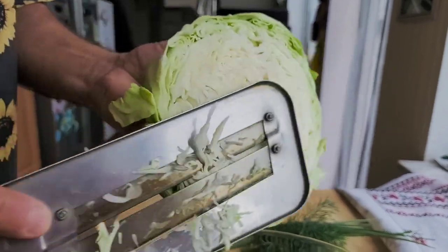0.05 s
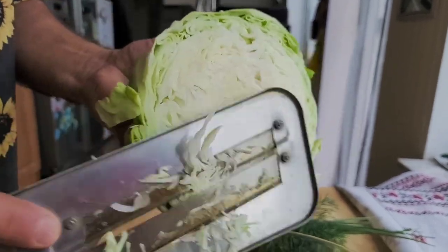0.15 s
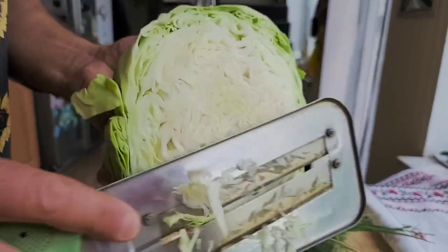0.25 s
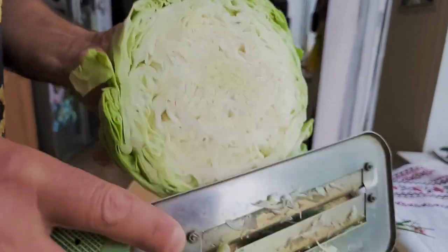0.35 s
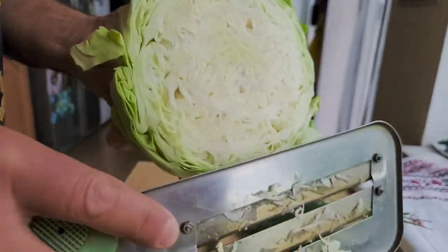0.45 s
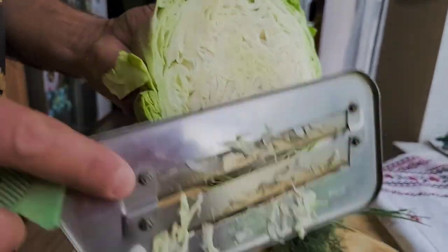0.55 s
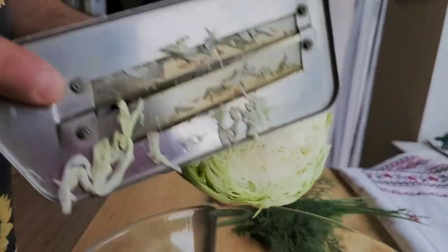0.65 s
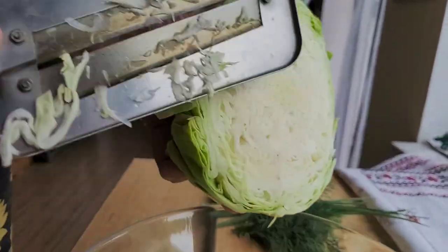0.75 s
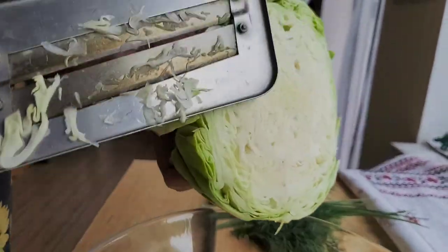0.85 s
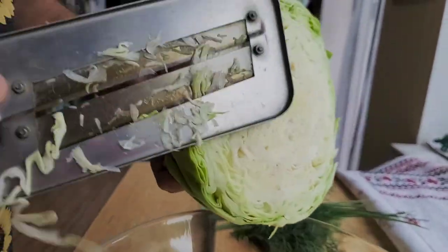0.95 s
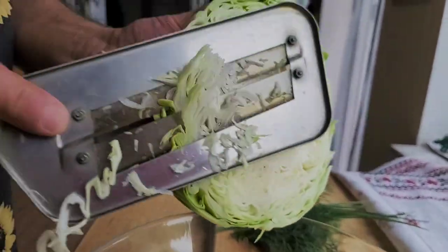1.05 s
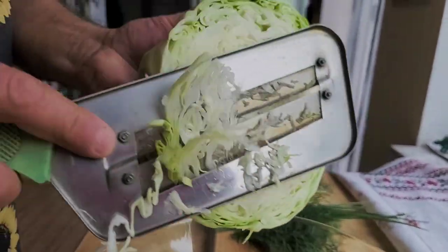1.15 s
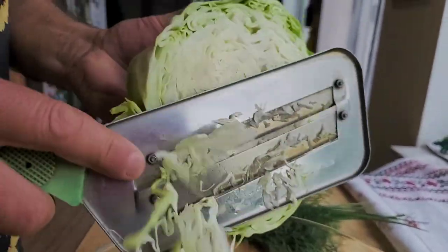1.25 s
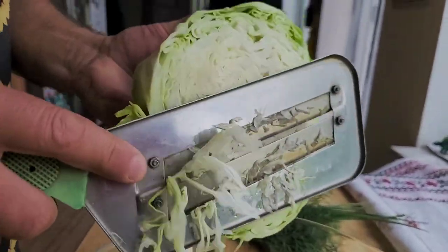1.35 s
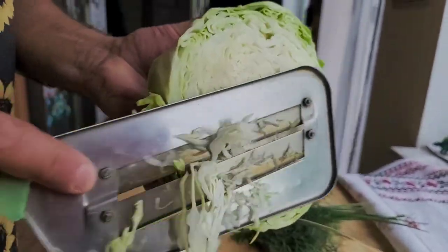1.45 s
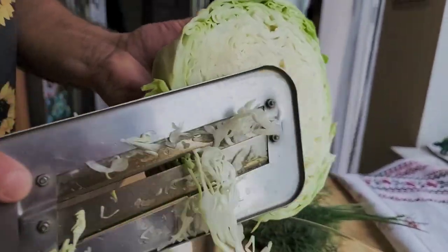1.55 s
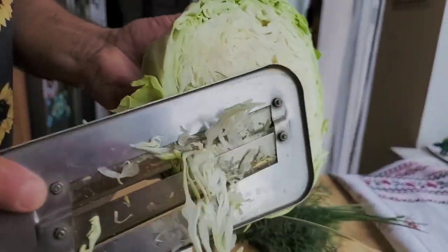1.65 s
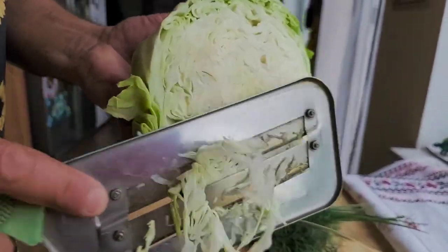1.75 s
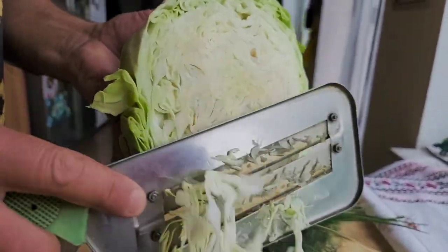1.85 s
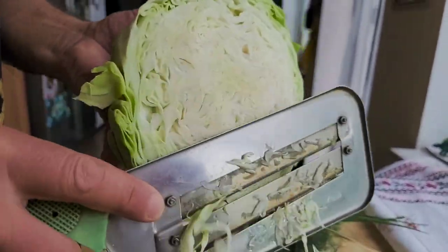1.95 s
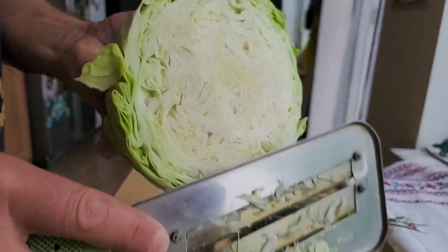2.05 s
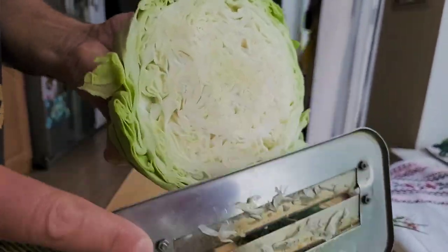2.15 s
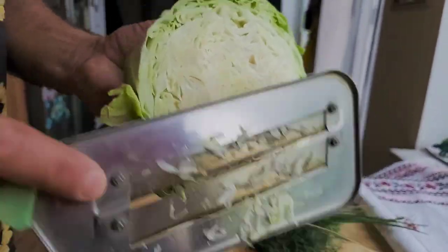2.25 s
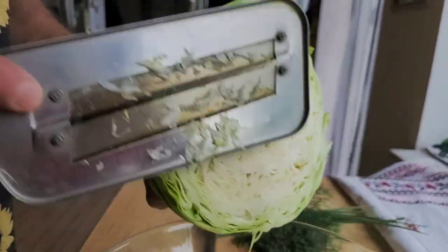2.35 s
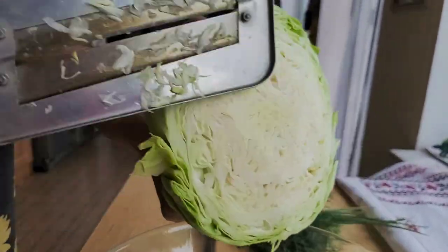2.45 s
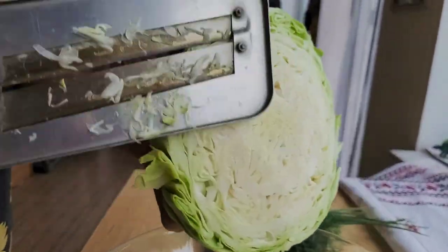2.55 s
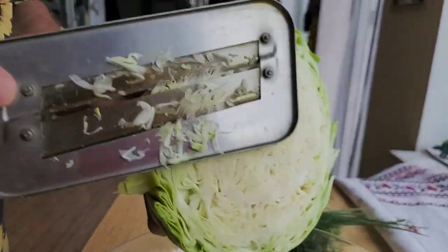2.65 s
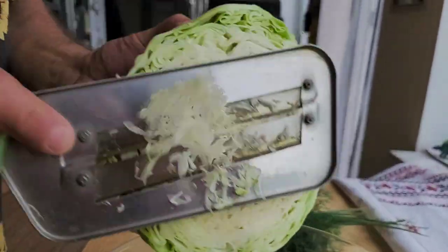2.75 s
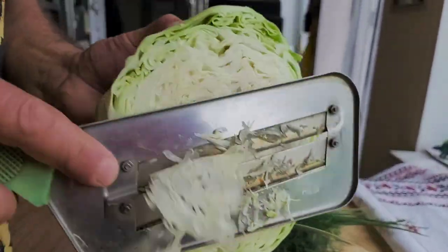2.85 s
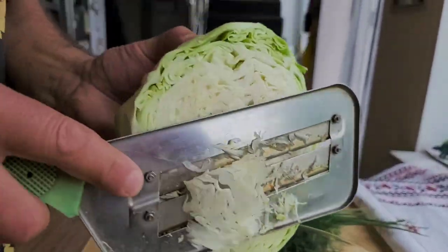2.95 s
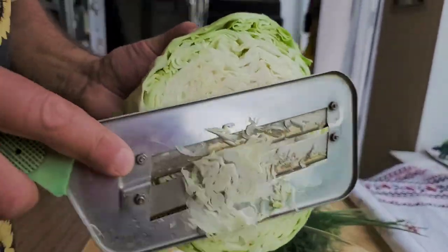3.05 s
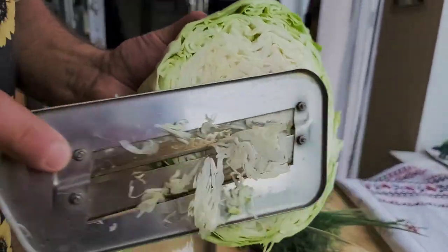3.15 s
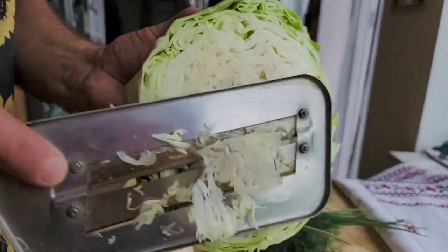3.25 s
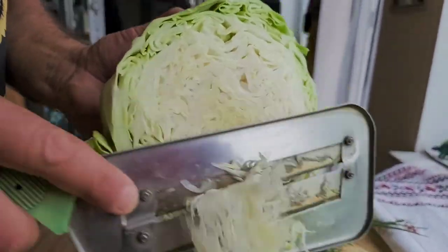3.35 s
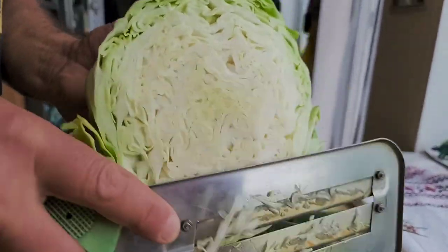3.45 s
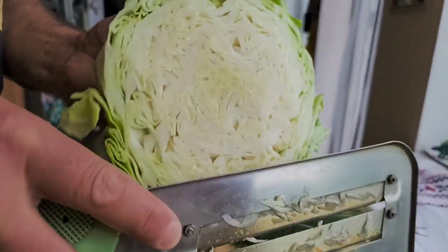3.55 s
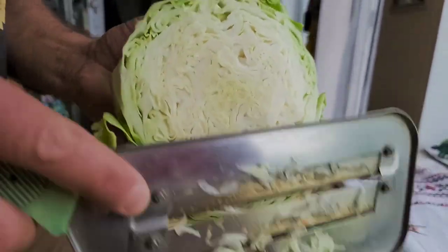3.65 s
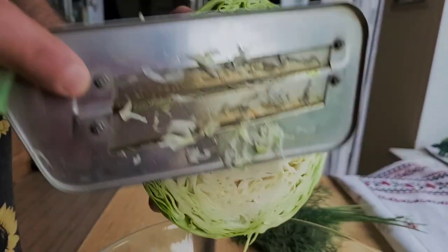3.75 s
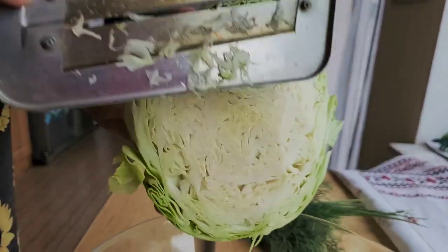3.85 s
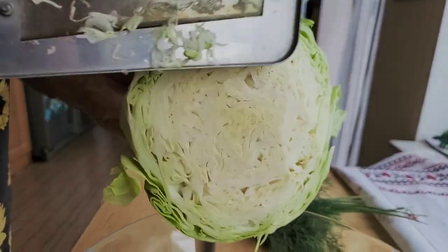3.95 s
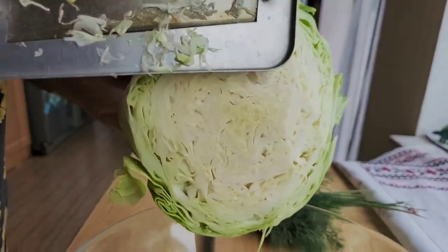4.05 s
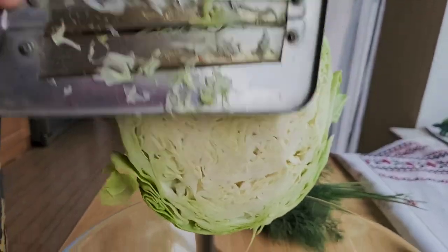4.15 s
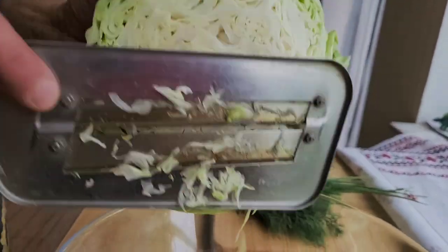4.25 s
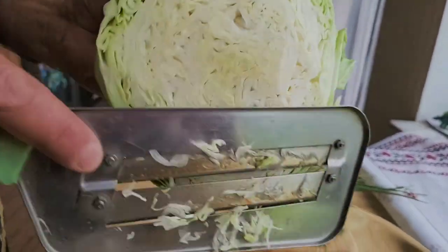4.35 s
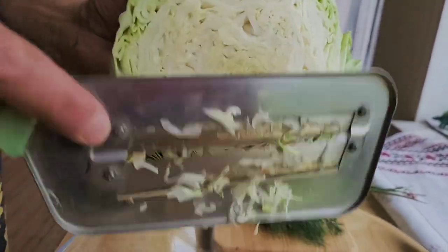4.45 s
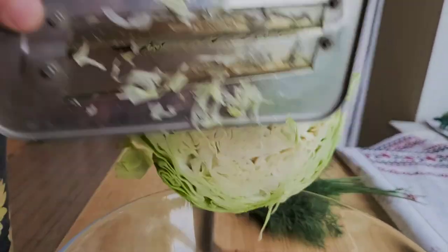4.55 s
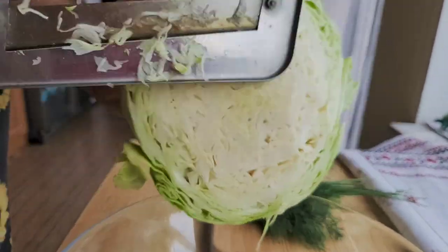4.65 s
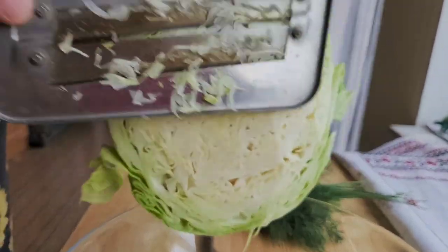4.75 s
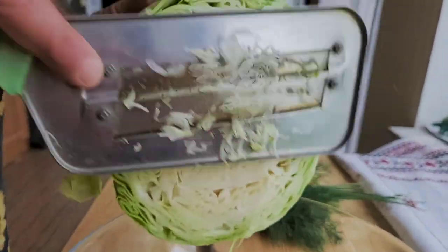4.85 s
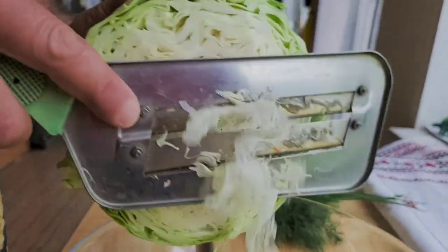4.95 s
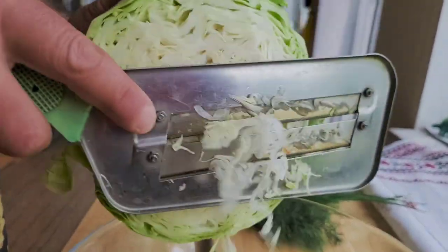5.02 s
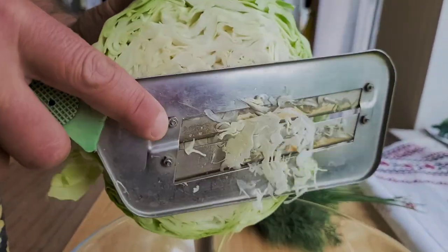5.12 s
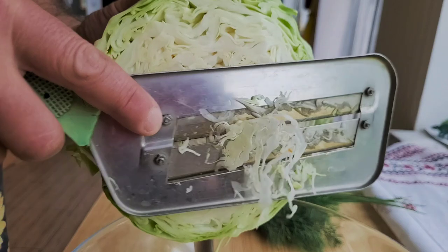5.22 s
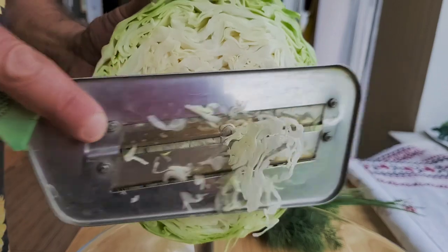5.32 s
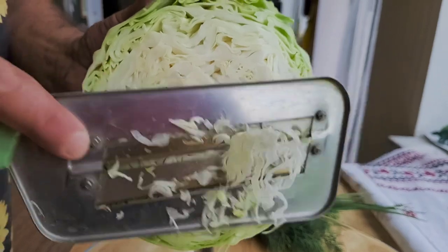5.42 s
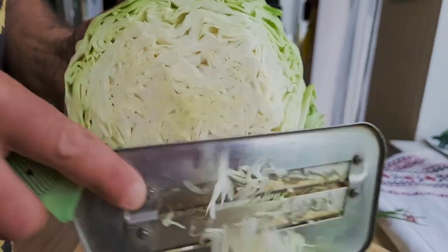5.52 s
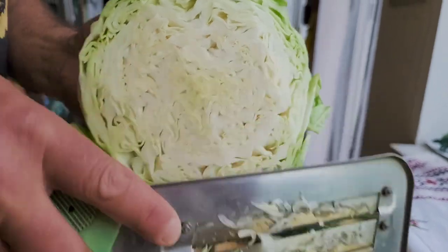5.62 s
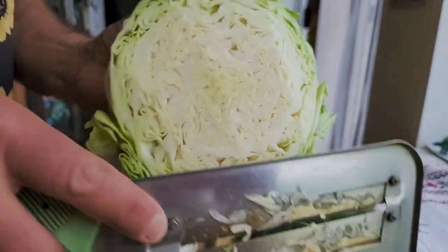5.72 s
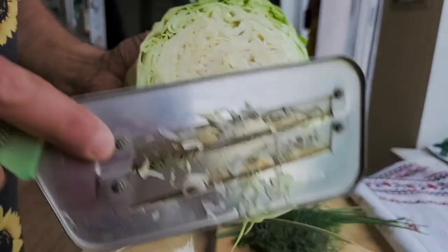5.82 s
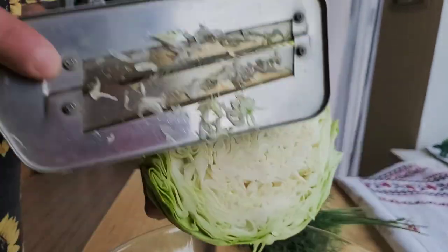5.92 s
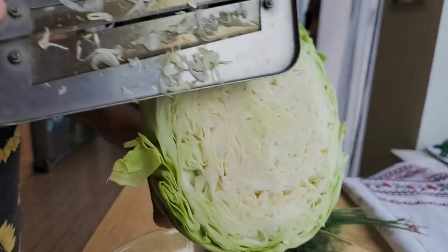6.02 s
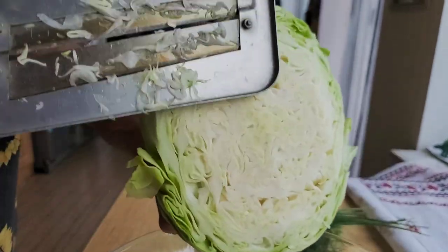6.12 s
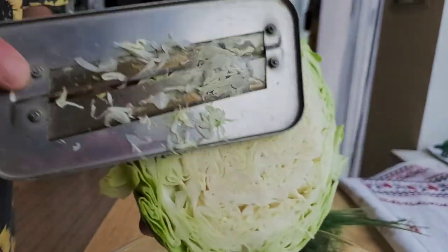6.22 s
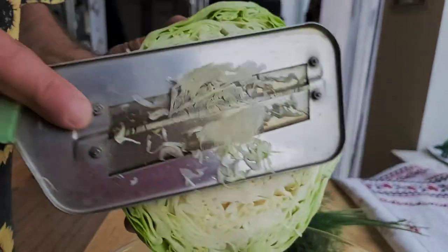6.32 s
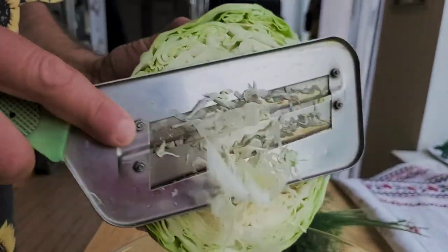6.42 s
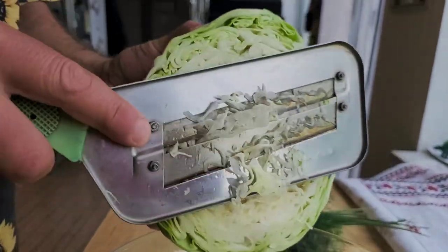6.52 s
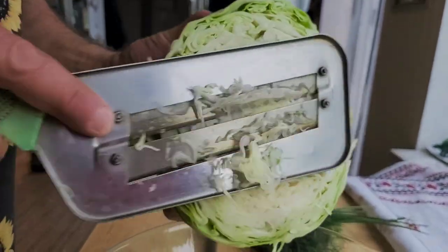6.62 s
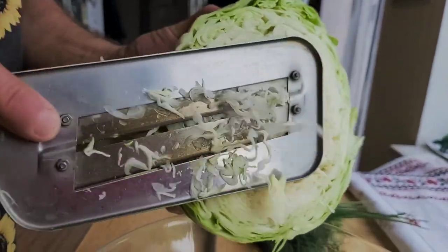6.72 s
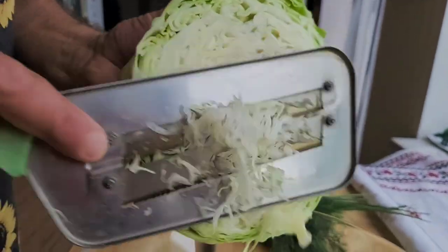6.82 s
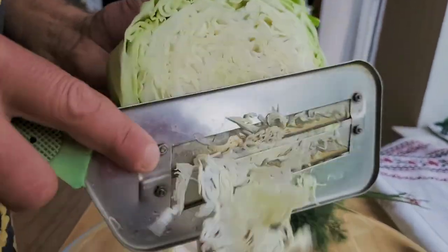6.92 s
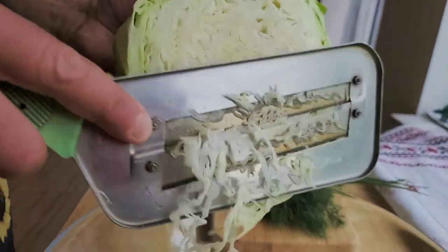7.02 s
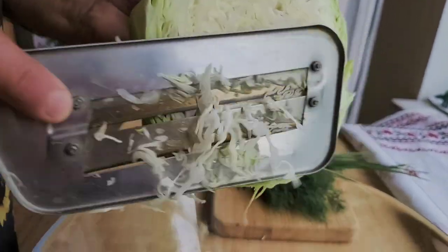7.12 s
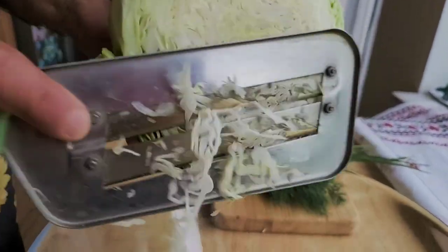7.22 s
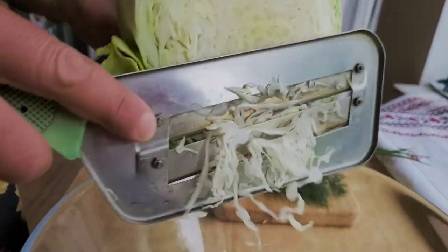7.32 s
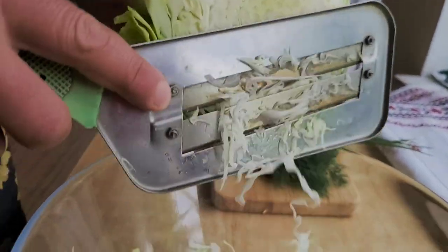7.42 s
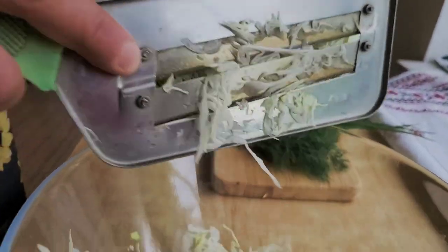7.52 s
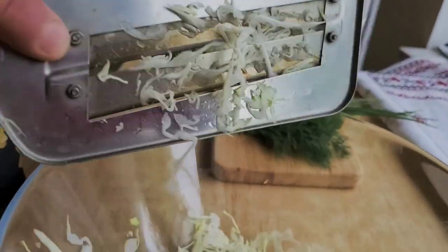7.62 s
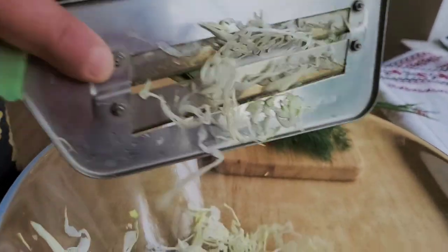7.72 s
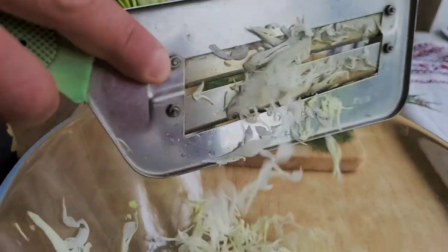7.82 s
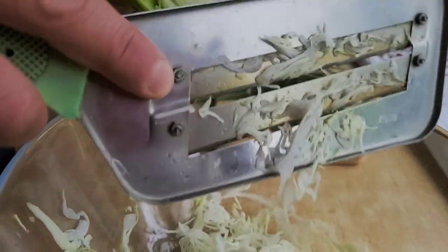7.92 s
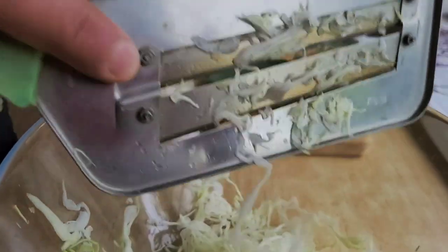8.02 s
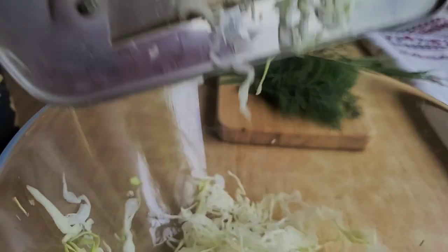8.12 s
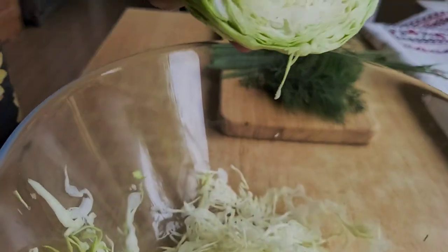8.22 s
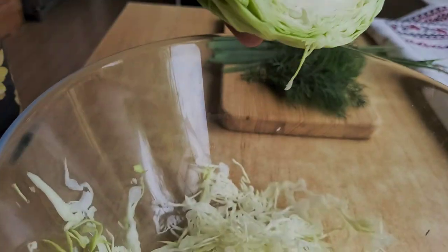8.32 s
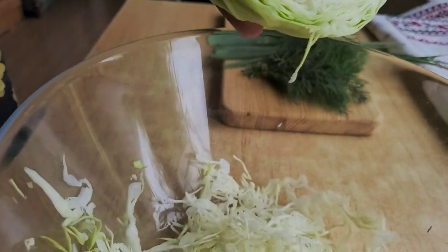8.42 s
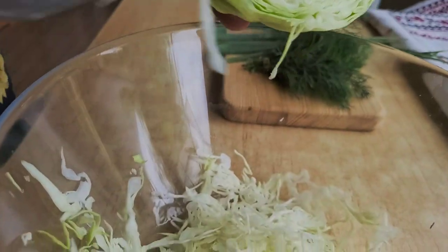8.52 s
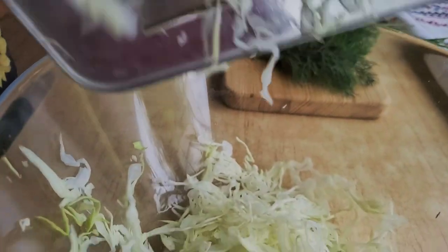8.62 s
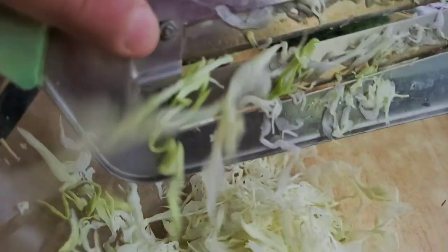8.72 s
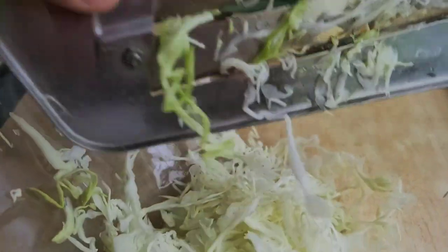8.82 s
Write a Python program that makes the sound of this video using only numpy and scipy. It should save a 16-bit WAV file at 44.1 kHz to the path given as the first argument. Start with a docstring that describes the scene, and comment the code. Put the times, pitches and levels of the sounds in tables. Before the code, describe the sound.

Close, crisp shredding of a cabbage against steel blades in short uneven strokes, ribs cracking and plate bumping, quiet low hum behind.

```python
"""In a small kitchen a steel hand shredder is pushed down the cut face of a cabbage, thirteen strokes.
Bursting leaf cells make a dense crunch of random clicks, filtered by the blades, the steel plate and the head.
Ribs snap, tear and judder; the plate bumps on the head as a few damped modes and slides wetly back.
An appliance hums, rumbles and whirs throughout, and faint reflections follow the shredder."""
import sys
import numpy as np
from scipy import signal
from scipy.io import wavfile

SR = 44100
rng = np.random.default_rng(int(sys.argv[2]) if len(sys.argv) > 2 else 0)


def wrap_up_sound(samples):
    """Save the sound to the file named by the first command line argument, as 16-bit audio."""
    columns = np.atleast_2d(samples).T
    # keep every value between -1 and 1, then stretch to whole-number steps
    tamed = np.clip(columns, -1, 1)
    steps = np.round(tamed * 32767).astype(np.int16)
    wavfile.write(sys.argv[1], SR, steps)


N = 391166  # length in samples
TIME = np.arange(N) / SR  # seconds

# The cutting strokes. Each row: start in seconds, length in seconds, time to bite in in seconds,
# crunch level in dB, place of the hardest push (0-1 of the stroke), then fizz, plate ring and head
# in dB relative to the crunch, and the rub as the plate runs out in dB; levels before layer trims.
CUTTING_STROKES = [ (0.108, 0.2, 0.024, -30.5, 0.44, 0, -7, -16, -58.5),
                   (0.867, 0.36, 0.031, -26.5, 0.61, 1, -9.5, -15.5, -45.5),
                   (1.589, 0.36, 0.015, -32.5, 0.47, 1, -6.5, -19, -64),
                   (2.519, 0.31, 0.0092, -25.5, 0.73, 1.5, -10, -19, -51),
                   (3.207, 0.23, 0.023, -26, 0.59, 0.5, -8, -17, -52),
                   (4.037, 0.12, 0.015, -30, 0.77, 1, -6, -7.5, -51),
                   (4.661, 0.34, 0.04, -23.5, 0.52, -2, -11, -20.5, -46.5),
                   (5.384, 0.168, 0.019, -25.4, 0.48, -2, -8.5, -14, -59.5),
                   (6.102, 0.29, 0.02, -25, 0.5, 0, -8.5, -19, -57),
                   (6.726, 0.17, 0.011, -23, 0.66, 0, -9.5, -18.5, -52),
                   (7.157, 0.17, 0.02, -28, 0.54, -0.5, -8.5, -14.5, -54),
                   (7.626, 0.2, 0.039, -27, 0.59, -0.5, -7, -9, -61),
                   (8.389, 0.25, 0.01, -26.5, 0.54, -3.5, -10, -10.5, -49.5), ]
# Colour of bursting cells at the blades. Each row: frequency in Hz, relative density in dB per Hz.
CRUNCH_COLOUR = [(1500, -20.5), (2300, -9.5), (2800, 1), (3400, -2), (4400, -2.5), (6300, -5), (8000, -2),
                 (11500, -1), (13800, -1), (16000, -7)]


def amp(db):
    """Level to amplitude: 20 dB is a factor of ten."""
    return 10 ** (np.asarray(db) / 20)


def read(points, hz):
    """Interpolation over log frequency, the axis on which octaves are equally wide."""
    f, value = np.transpose(points)
    return np.interp(np.log(hz + 1), np.log(f + 1), value)


def evened(pair):
    """Normalisation: scales a stereo pair so that the mean of its channels has rms 1."""
    return pair / np.sqrt(np.mean(pair.mean(0) ** 2) + 1e-20)


def add(mix, s, sound):
    """Superposition: adds a sound at s seconds, or at the very start if s is negative."""
    part = mix[:, max(round(s * SR), 0):][:, :sound.shape[-1]]
    part += sound[..., :part.shape[1]]


def colour(pair, spectrum, side=1, size=4096):
    """Minimum-phase filtering: the spectrum fixes a causal response; side scales the left-right tilt."""
    # Stereo tilt of the shredder. Each row: frequency in Hz, left over right in dB.
    tilt = [(200, -0.5), (700, 1), (1200, -2), (2500, -2.5), (3600, 8.5), (6300, 1), (10000, 7.5),
            (16000, 9.5)]
    hz = abs(np.fft.fftfreq(size, 1 / SR))
    octaves_below = np.maximum(np.log2(spectrum[0][0] / (hz + 1)), 0)
    octaves_above = np.maximum(np.log2((hz + 1) / spectrum[-1][0]), 0)
    # past the ends of the table the gain falls 40 dB per octave
    db = np.maximum(read(spectrum, hz) - 40 * (octaves_below + octaves_above), -90)
    log_gain = np.log(amp(db + side * np.array([[.5], [-.5]]) * read(tilt, hz)))
    # the Hilbert transform of the log gain gives the minimum phase
    taps = np.fft.ifft(np.exp(np.conj(signal.hilbert(log_gain)))).real
    return signal.oaconvolve(pair, taps, axes=1)[:, :pair.shape[1]]


def wander(hz):
    """Band-limited random drift: straight lines between hz normal random values a second."""
    knots = rng.standard_normal(N // 20)
    return np.interp(TIME * hz, np.arange(len(knots)), knots)


def span(start, length, rise_s, fall_s):
    """Contact envelope: linear rise, hold and linear fall within one length."""
    return np.clip((TIME - start) / rise_s, 0, 1) * np.clip((start + length - TIME) / fall_s, 0, 1)


def bursts(per_s, spread_db, clump_db, clump_hz):
    """Random impulse process: cells burst at per_s a second on average, their sizes drifting in clumps."""
    size = amp(spread_db * np.minimum(rng.exponential(1, N), 5) + clump_db * wander(clump_hz))
    clicks = size * rng.choice([-1, 1], N) * (rng.random(N) < per_s / SR)
    # each click reaches the right channel with a delay of its own
    lag = np.round(rng.uniform(.00003, .00036, N) * SR).astype(int)
    return np.array([clicks, np.bincount(np.arange(N) + lag, clicks)[:N]])


def ring(pair, t60, ring_db, moves_hz, count=12, size=4096):
    """Impulse response of wet steel: clicks excite noise tails that change as the contact jumps along the blade."""
    t = np.arange(size) / SR
    tails = rng.standard_normal((count, 2, size)) * amp(-60 * t / t60)
    tails *= amp(ring_db) / np.linalg.norm(tails, axis=2, keepdims=True)
    place = rng.integers(0, count, N // 20)[(TIME * moves_hz).astype(int)]
    rung = sum(signal.oaconvolve(pair * (place == k), tails[k], axes=1)[:, :N] for k in range(count))
    return pair + rung


def appliance(hum_hz=50, hum_db=-66, rumble_db=-53, hiss_db=-77.5):
    """Steady sources: a mains sine, and filtered noise as a low rumble, a thin wavering whir and an even hiss."""
    # Rumble colour. Each row: frequency in Hz, relative density in dB per Hz.
    rumble_colour = [(25, -30), (50, -14), (75, -13.5), (140, -15), (190, -8), (245, -1), (305, -2.5),
                     (350, -3), (395, -16), (480, -16), (560, -22.5), (1000, -23.5), (1500, -34),
                     (2600, -46)]
    # Whir colour. Each row: frequency in Hz, relative density in dB per Hz.
    whir_colour = [(1300, -22), (1600, -6.5), (1800, 0), (1980, -9.5), (2250, -21.5)]
    # Mean whir level. Each row: time in seconds, level in dB.
    whir_course = [(0, -67), (2.4, -66.5), (3.7, -70.5), (4.5, -70.5), (6, -67), (8, -74), (8.87, -70.5)]
    air = rng.standard_normal((8, N))
    # a shared noise holds the two channels partly together
    rumble = evened(colour(air[0] + .5 * air[1:3], rumble_colour, side=0))
    rumble *= amp(rumble_db + 1.5 * wander(14))
    whir = evened(colour(air[3] + 0.98 * air[4:6], whir_colour, side=0))
    whir *= amp(np.interp(TIME, *np.transpose(whir_course)) + 1.3 * wander(60))
    hum = amp(hum_db) * np.sqrt(2) * np.sin(2 * np.pi * hum_hz * TIME)
    return rumble + whir + hum + amp(hiss_db) * evened(air[6:])


def touches(release_s=0.017, runout_s=0.16, slide_edge_s=0.03, slide_swell_db=4.5):
    """Power addition of light contacts: the run-out of each cut, the slides back and the brushed shreds."""
    # The plate sliding back over the wet face. Each row: start in seconds, length in seconds,
    # level at mid-slide in dB before the rub trim.
    slides_back = [(1.387, 0.24, -58), (2.98, 0.24, -56.5), (5.173, 0.195, -59), (5.62, 0.17, -68.5),
                   (6.505, 0.21, -49), (6.96, 0.36, -53), (7.427, 0.21, -55.5)]
    # The plate brushing loose shreds and leaf edges. Each row: middle in seconds,
    # length in seconds (two standard deviations), peak level in dB before the rub trim.
    rustles = [(0.0, 0.032, -36), (0.282, 0.02, -35), (0.842, 0.011, -44.5), (1.34, 0.032, -37),
               (1.443, 0.028, -50), (1.965, 0.026, -37), (2.907, 0.027, -50), (3.009, 0.025, -49.5),
               (3.493, 0.038, -48.5), (4.027, 0.019, -38.5), (4.266, 0.024, -48.5), (5.079, 0.024, -47.5),
               (5.342, 0.037, -50), (6.662, 0.032, -30), (7.121, 0.016, -40), (7.608, 0.042, -42.5)]
    power = np.zeros(N)
    for start, length, *_, runout_db in CUTTING_STROKES:
        runout = span(start + length - release_s, runout_s, release_s, runout_s)
        power += (amp(runout_db) * runout) ** 2
    for start, length, db in slides_back:
        # the plate presses harder as the next stroke nears
        swell = slide_swell_db * np.clip((TIME - start) / length - .5, -.5, .5)
        power += (amp(db + swell) * span(start, length, slide_edge_s, slide_edge_s)) ** 2
    for middle, length, db in rustles:
        near = abs(TIME - middle) < 2 * length
        power[near] += (amp(db) * np.exp(-2 * ((TIME[near] - middle) / length) ** 2)) ** 2
    return np.sqrt(power)


def sliding(cling_s=0.014, cling_db=-9, rub_db=0.25):
    """Light friction as sparse impulses: blades tick over leaf edges; clinging shreds crackle on a little longer."""
    # Wet rub colour. Each row: frequency in Hz, relative density in dB per Hz.
    wet_colour = [(300, -18.5), (600, -1.5), (1100, 0), (2000, 1.5), (3300, 0.5), (6000, -3.5), (11000, -1),
                  (16000, -3)]
    ticks = bursts(per_s=1900, spread_db=3.0, clump_db=5.5, clump_hz=111)
    rub = evened(colour(ring(ticks, t60=0.1, ring_db=3.5, moves_hz=70.4), wet_colour))
    crackles = bursts(per_s=130, spread_db=-0.5, clump_db=-2.0, clump_hz=30)
    shreds = evened(colour(ring(crackles, t60=0.014, ring_db=2, moves_hz=39.4), CRUNCH_COLOUR))
    contact = touches()
    # a one-pole smoother lets the crackle lag the contact
    keep = np.exp(-1 / (cling_s * SR))
    clinging = signal.lfilter([1 - keep], [1, -keep], contact)
    return amp(rub_db) * rub * contact + amp(cling_db) * shreds * clinging


def snaps(click=2.15, crack_s=0.0018, knock_s=0.0056, knock_db=2, rustle_s=0.029, rustle=0.13, size=4096):
    """Brittle fracture: a decaying noise burst as a rib gives way, a knock in the plate and a brief rustle."""
    # Ribs snapping, shreds flicking off and taps on the plate. Each row: time in seconds, crack peak in dB,
    # knock peak in dB before the knock trim, brightness in dB per octave.
    snap_events = [(0.0682, -34.5, -39, -8.5), (0.2812, -21.5, -22.5, -4.5), (1.328, -26, -51, 2),
                   (1.3404, -19, -54, 11), (1.743, -15, -42, -1), (1.879, -26, -36, -8),
                   (1.9331, -20.5, -30, 3.5), (1.976, -22.5, -25.5, 2), (1.989, -23.5, -25, -5),
                   (3.0026, -31, -50, -1.5), (3.445, -13, -40, 2.5), (3.973, -28, -32.5, -5.5),
                   (4.0157, -28.5, -55, 3), (4.047, -24, -32, 0), (4.138, -17.5, -47, 6.5),
                   (4.3045, -34, -49.5, 2), (4.636, -31.5, -33, -5), (5.0959, -29.5, -37, -4.5),
                   (5.678, -38, -46.5, 2), (5.7744, -24, -48.5, 7.5), (6.0732, -25.5, -35.5, 2.5),
                   (6.4614, -34, -40.5, -5.5), (6.985, -34, -38, -7), (7.4698, -33, -66, 5.5),
                   (8.282, -54.5, -40, -8), (8.3954, -27, -26, 1), (8.408, -18.5, -23.5, -6),
                   (8.656, -32, -32, -1), (8.7, -47, -35, 8), (8.814, -34.5, -32.5, 3)]
    # Plate knock colour. Each row: frequency in Hz, relative density in dB per Hz.
    knock_colour = [(120, -10), (300, 6.5), (600, 2), (1200, 3), (2000, -2.5), (3200, -26.5), (6000, -26)]
    out, t = np.zeros((2, N)), np.arange(size) / SR
    for s, peak_db, plate_db, bright_db in snap_events:
        spectrum = [(hz, db + bright_db * np.log2(hz / CRUNCH_COLOUR[0][0])) for hz, db in CRUNCH_COLOUR]
        tear = rng.standard_normal((3, size)) + click * (t == 0)
        decay = np.exp(-t / crack_s) + rustle * np.exp(-t / rustle_s)
        crack = colour(tear[:2] * decay, spectrum)
        knock = colour((tear[2] + 0.73 * tear[:2]) * np.exp(-t / knock_s), knock_colour)
        add(out, s, amp(peak_db) * crack / abs(crack.mean(0)).max())
        add(out, s, amp(plate_db + knock_db) * knock / abs(knock.mean(0)).max())
    return out


def judders(per_s=900, sharpness=6):
    """Stick-slip: a rib catches and slips at random moments, which keeps one resonance ringing."""
    # Juddering ribs. Each row: middle in seconds (0.1 at the earliest, see add),
    # length in seconds (two standard deviations), pitch in Hz, level in dB.
    judder_events = [(0.005, 0.02, 1400, -50), (1.818, 0.067, 1110, -38), (1.938, 0.014, 1430, -34.5),
                     (3.358, 0.04, 3500, -32), (3.384, 0.033, 1120, -32), (3.387, 0.037, 592, -35),
                     (4.09, 0.059, 332, -33.5), (4.817, 0.025, 875, -34.5), (4.93, 0.025, 1900, -35),
                     (5.481, 0.02, 1790, -29.5), (5.488, 0.032, 1040, -30.5), (6.865, 0.023, 3380, -31),
                     (7.301, 0.029, 570, -35.5), (8.561, 0.04, 590, -60)]
    out = np.zeros((2, N))
    for s, length, hz, db in judder_events:
        t = np.arange(-.1, .1, 1 / SR)
        slips = rng.standard_normal((3, len(t))) * (rng.random(len(t)) < per_s / SR)
        drive = slips[:2] + slips[2] * (1000 / hz) ** 2  # low notes reach both channels alike
        note = evened(signal.lfilter(*signal.iirpeak(hz, sharpness, fs=SR), drive))
        add(out, s + t[0], amp(db) * note * np.exp(-2 * (t / length) ** 2))
    return out


def tearing(tear_hz, octaves, cycles, per_s, runs_hz=45, hold=0.67, count=12):
    """Damped oscillators struck at random: thick ribs tear in short runs of pops, each of twelve pitches in turns."""
    out, t = np.zeros((2, N)), np.arange(1024) / SR
    for hz in tear_hz * 2 ** (octaves * np.linspace(-.5, .5, count)):
        pop = np.sin(2 * np.pi * hz * t) * np.exp(-t * hz / cycles) * np.sqrt(hz)
        run = np.maximum(wander(runs_hz) - hold, 0)  # only the crests of the drift sound
        pops = run * rng.standard_normal(N) * (rng.random(N) < per_s / SR)
        sound = signal.oaconvolve(pops, pop)[:N]
        out += [sound, np.roll(sound, rng.integers(2, 15))]
    return evened(out)


def pushes(arch_db=9.5, release_s=0.017, loose_s=0.036, fizz_follow=0.99, plate_follow=0.68, body_follow=0.58,
           plate_rise_db=2.5, body_rise_db=4):
    """Force envelope: a stroke bites in, arches over its hardest push and lets go; four layers follow by share."""
    # Loosely packed leaves, which resist the cut less. Each row: middle in seconds, dip in dB.
    loose_leaves = [(0.25, -3.5), (1.085, -6), (3.338, -2.5), (4.885, -2.5), (7.76, -3)]
    gains = np.zeros((4, N))
    for start, length, bite_s, db, hardest, fizz_db, plate_db, body_db, _ in CUTTING_STROKES:
        gate = span(start, length, bite_s, release_s)
        cutting = gate > 0
        t = TIME[cutting]
        way = (t - start) / length
        arch = -arch_db * (2 * (way - hardest)) ** 2  # arch_db weaker half a stroke from the hardest push
        arch += sum(dip_db * np.exp(-((t - middle) / loose_s) ** 2) for middle, dip_db in loose_leaves)
        fizz = fizz_db + fizz_follow * arch
        # plate and head ring more as the stroke goes on
        plate = plate_db + plate_follow * arch + plate_rise_db * (way - .5)
        body = body_db + body_follow * arch + body_rise_db * (way - .5)
        gains[:, cutting] += gate[cutting] * amp(db + np.array([arch, fizz, plate, body]))
    return gains


def shredding(uneven_db=0.83, uneven_hz=90, fizz_hz=7000):
    """One source, three paths: the same bursts are heard directly, through the plate and through the head."""
    # Steel plate colour. Each row: frequency in Hz, relative density in dB per Hz.
    plate_colour = [(600, -16.5), (800, -14), (950, -4.5), (1120, -2.5), (1350, -3.5), (2100, -3.5),
                    (2600, -11), (3400, -27)]
    # Cabbage head colour. Each row: frequency in Hz, relative density in dB per Hz.
    body_colour = [(90, -28.5), (170, -16.5), (240, -3.5), (315, 0), (410, -14), (500, -2), (595, 3),
                   (690, -1), (790, -23), (1100, -28.5)]
    cells = bursts(per_s=11000, spread_db=2.0, clump_db=0.5, clump_hz=232.1)
    direct = evened(colour(ring(cells, t60=0.053, ring_db=-3.5, moves_hz=89.6), CRUNCH_COLOUR))
    ribs = tearing(tear_hz=2894, octaves=1.2, cycles=4.5, per_s=700) * amp([[1.5], [-1.5]])
    crunch = evened(direct + amp(-15) * ribs)
    # the fizz of the finest cells is the top of the crunch
    fizz = signal.sosfiltfilt(signal.butter(2, fizz_hz, "high", fs=SR, output="sos"), crunch)
    steel = evened(colour(ring(cells, t60=0.078, ring_db=-3, moves_hz=54.92), plate_colour))
    plate_ribs = tearing(tear_hz=1432, octaves=1.8, cycles=6.8, per_s=500)
    plate = evened(steel + amp(-6.5) * plate_ribs) * amp(-0.5)
    body = evened(colour(cells, body_colour)) * amp(-0.4)
    layers = (crunch - fizz, fizz, plate, body)
    cut = sum(layer * gain for layer, gain in zip(layers, pushes()))
    return cut * amp(uneven_db * wander(uneven_hz))  # the leaves resist unevenly


def bumps(rise_s=0.0018, bump_db=-2.5, left_db=2.5):
    """Modal response of a heavy body: the head answers the plate with damped modes, lower ones dying more slowly."""
    # The plate bumping the head. Each row: time in seconds, peak in dB before the bump and channel trims,
    # pitch of the thud in Hz.
    landings = [(0.281, -43, 276), (0.835, -33.5, 78), (1.975, -32.5, 285), (3.001, -37.5, 280),
                (3.973, -27, 133), (4.116, -27.5, 235), (4.636, -18, 249), (5.544, -35.5, 212),
                (6.072, -29.5, 98.6), (8.395, -25.5, 94)]
    # Modes of the head. Each row: factor on the pitch, level in dB, cycles until it has died by 60 dB.
    head_modes = [(0.299, -13.5, 6), (0.599, -4, 5), (1, 4.5, 6.5), (2.1, 0, 11.5), (4.3, -10, 24.5)]
    out, t = np.zeros((2, N)), np.arange(SR // 4) / SR
    for s, peak_db, pitch in landings:
        thud = np.zeros(len(t))
        for factor, db, cycles in head_modes:
            hz = pitch * factor
            thud += amp(db - 60 * hz * t / cycles) * np.sin(2 * np.pi * hz * t)
        thud *= 1 - np.exp(-t / rise_s)
        add(out, s, amp(peak_db + bump_db) * thud / abs(thud).max())
    return out * amp([[left_db], [-left_db]])


def pings(ping_db=-1, scrape_s=0.0035, per_s=2500):
    """Convolution of force and modes: a shred scrapes off a free blade, which rings briefly."""
    # Plucked blades. Each row: time in seconds, peak in dB before the ping trim.
    plucks = [(7.0604, -34)]
    # Modes of the blade. Each row: frequency in Hz, level in dB, t60 in seconds.
    blade_modes = [(5960, 1, 0.058), (6900, -11, 0.096), (7165, -20, 0.104), (7850, -2, 0.05)]
    out, t = np.zeros((2, N)), np.arange(SR // 5) / SR
    modes = sum(amp(db - 60 * t / t60) * np.sin(2 * np.pi * hz * t) for hz, db, t60 in blade_modes)
    for s, peak_db in plucks:
        scrape = rng.standard_normal(len(t)) * (rng.random(len(t)) < per_s / SR) * np.exp(-t / scrape_s)
        ping = signal.fftconvolve(scrape, modes)
        add(out, s, amp(peak_db + ping_db) * ping / abs(ping).max())
    return out


def kitchen(pair, first_s=.005):
    """Reverberation: sparse random reflections, each band decaying exponentially at its own speed."""
    # Reverberation time of the room. Each row: frequency in Hz, t60 in seconds.
    room_decay = [(200, 0.23), (700, 0.31), (2000, 0.31), (5000, 0.25), (15000, 0.09)]
    taps = rng.standard_normal((2, SR // 2)) * (rng.random((2, SR // 2)) < .1)
    taps[:, :round(first_s * SR)] = 0
    hz, t, z = signal.stft(taps, SR, nperseg=256)
    tail = signal.istft(z * amp(-60 * t / read(room_decay, hz)[:, None]), SR)[1]
    source = pair + 0.61 * pair[::-1]  # each side also feeds the other
    return signal.fftconvolve(source, tail / np.linalg.norm(tail[0]), axes=1)[:, :N]


def scene():
    """Superposition of the shredder close by, its echo and the room's own sound."""
    near = shredding() + judders() + sliding() + snaps() + bumps() + pings()
    return near + amp(-16) * kitchen(near) + appliance()


def record(dry, low_cut_hz=42, edge_hz=15950):
    """Band limiting: a high-pass cuts the bass and a linear-phase low-pass ends the treble."""
    lean = signal.sosfilt(signal.butter(4, low_cut_hz, "high", fs=SR, output="sos"), dry)
    taps = signal.firwin(401, edge_hz, window=("kaiser", 8), fs=SR)
    return signal.oaconvolve(lean, taps[None], "same", axes=1)


dry = scene()
out = record(dry)
wrap_up_sound(out)
```